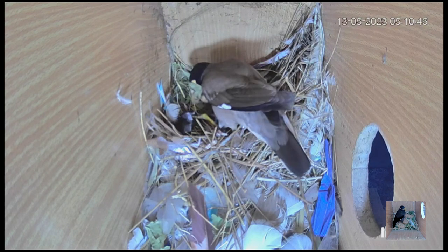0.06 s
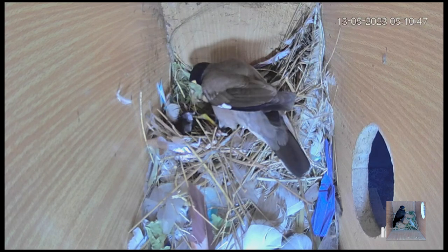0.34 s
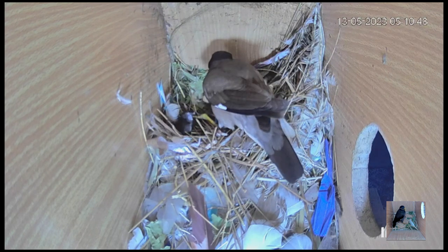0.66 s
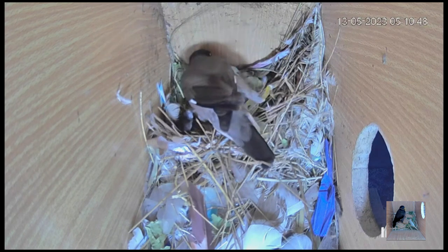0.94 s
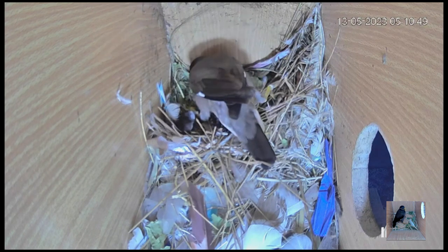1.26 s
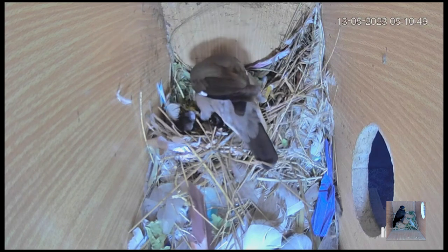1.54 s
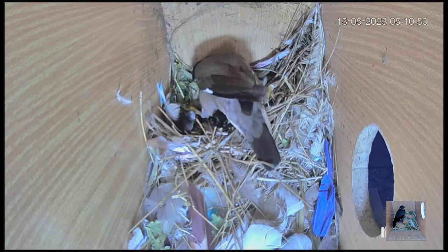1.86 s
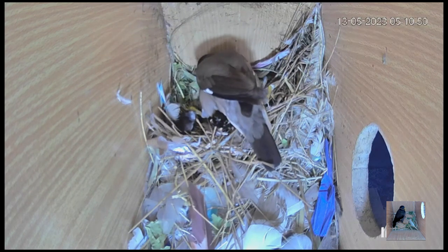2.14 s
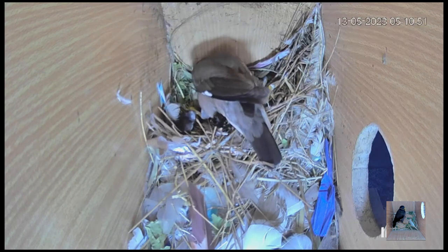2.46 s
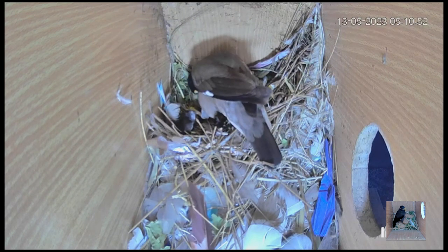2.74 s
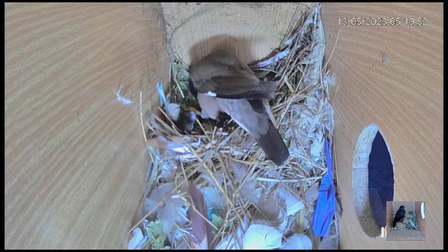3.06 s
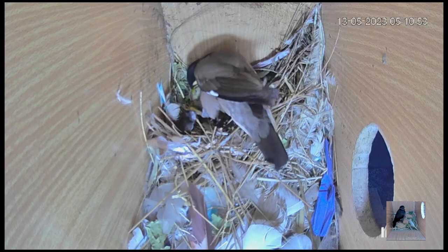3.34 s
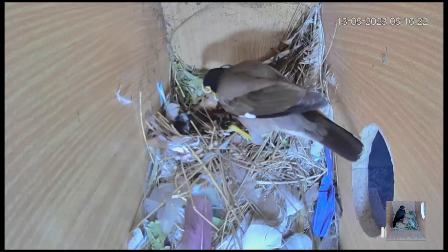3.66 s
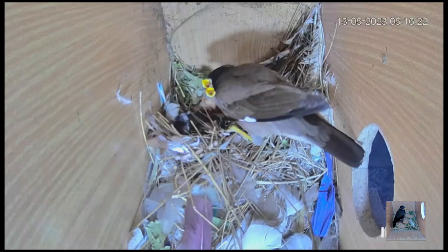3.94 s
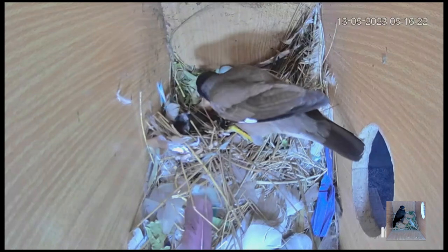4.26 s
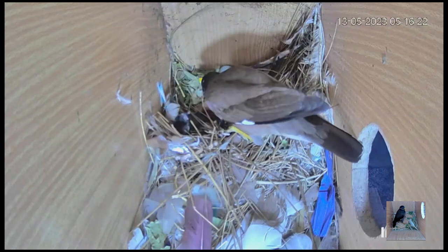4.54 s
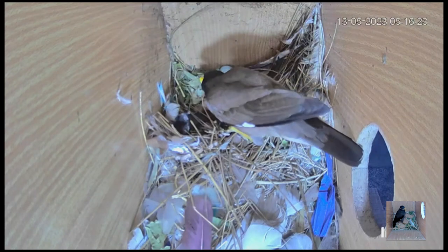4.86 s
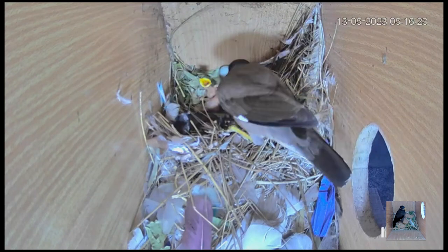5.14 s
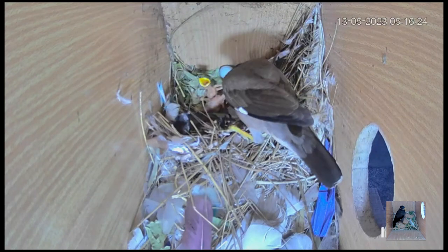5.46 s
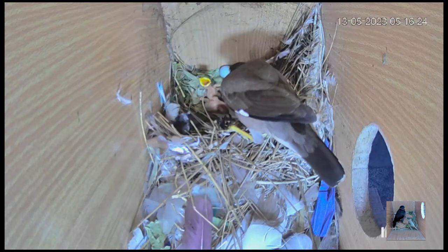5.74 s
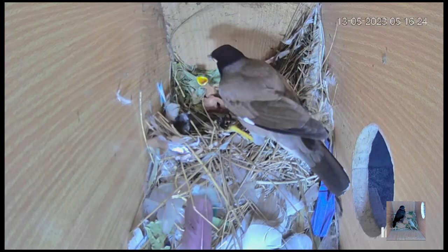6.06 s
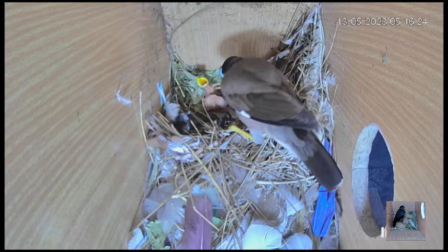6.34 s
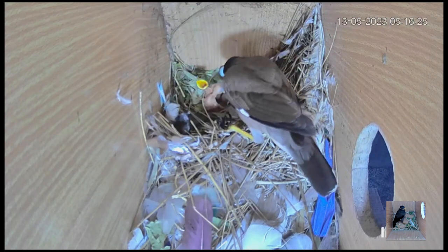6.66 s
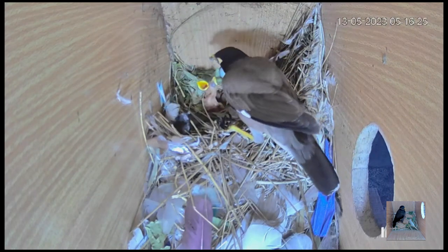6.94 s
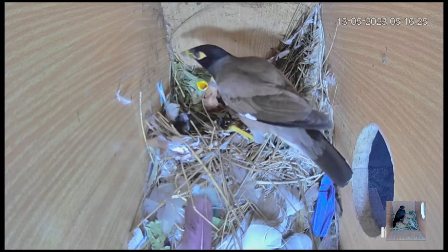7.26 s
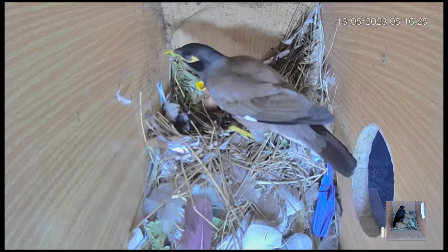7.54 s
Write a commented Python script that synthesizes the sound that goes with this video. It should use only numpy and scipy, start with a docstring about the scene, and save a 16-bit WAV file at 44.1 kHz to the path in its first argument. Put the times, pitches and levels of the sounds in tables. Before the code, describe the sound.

Newly hatched chicks give short, high cheeps inside a wooden nest box, close to the microphone. An adult bird shifts about, crackling dry straw, thudding softly and knocking on the wood, loudest about a second in. Halfway through, the sound cuts out for an instant; then the chicks beg with quieter, raspy, falling calls. Faint birds peep and call outside over a low rumble and thin hiss.

```python
"""Soft arched cheeps, then rasping, falling begging calls: newly hatched chicks in a wooden nest box,
close to a nest camera's microphone. They cheep from under the parent and beg as it steps aside.
The parent snaps straw, thuds on the floor, knocks and scrapes the wood; the close walls echo.
Other birds peep, hoot and call outside, over low rumble and thin hiss.
The sound drops out for a moment half way through."""
import sys
import numpy as np
from scipy import signal
from scipy.fft import rfft, irfft, next_fast_len
from scipy.io import wavfile

SR = 44100
rng = np.random.default_rng(int(sys.argv[2]) if len(sys.argv) > 2 else 0)


def master_out(mix):
    """Clip the mix to full scale and print it as 16-bit PCM to the path in sys.argv[1]."""
    frames = np.transpose(np.atleast_2d(mix))
    ceiling = np.clip(frames, -1, 1)
    pcm = np.round(ceiling * 32767).astype(np.int16)
    wavfile.write(sys.argv[1], SR, pcm)


N = 334719
TIME = np.arange(N) / SR

# parent's moves on the straw: (centre time [s], half length [s], level [dB])
MOVES = [(0.094, .016, -67.5), (0.792, .0028, -60), (0.977, .014, -32.5), (1.026, .0046, -33),
         (1.039, .018, -38), (1.099, .008, -47.5), (0.1, .06, -71.5), (1.75, .12, -77), (1.157, .003, -56),
         (1.573, .013, -56), (1.693, .02, -60.5), (1.88, .015, -65), (2.925, .036, -65.5),
         (2.957, .0046, -54), (2.992, .02, -66.5), (3.214, .007, -68), (3.274, .02, -66),
         (3.447, .024, -66.5), (3.814, .052, -72.5), (3.9, .013, -67.5), (4.209, .008, -77),
         (4.748, 0.0027, -70.5), (5.436, .012, -78.5), (5.571, 0.021, -77), (5.874, .011, -59),
         (6.388, .02, -70), (7.48, 0.0047, -74)]
RASP_PITCH_RATIO = 0.81  # rasp pitch / crest pitch of a begging call


def undb(db):
    """Decibels to gain."""
    return 10 ** (np.asarray(db) / 20)


def unit(x):
    """Scale to rms 1."""
    return x / np.sqrt(np.mean(np.abs(x) ** 2))


def gain_at(hz, spectrum):
    """Gain at hz of a (frequency [Hz], level [dB]) spectrum."""
    points_hz, db = np.transpose(spectrum)
    return undb(np.interp(np.log(np.maximum(hz, 1)), np.log(points_hz), db))


def colour(x, spectrum):
    """Filter by a (frequency [Hz], level [dB]) spectrum; rms 1."""
    return unit(irfft(rfft(x) * gain_at(np.fft.rfftfreq(N, 1 / SR), spectrum), N))


def flutter(width_hz, size):
    """Complex random wavering, slower than width_hz; rms 1."""
    band = 1 / (1 + (np.fft.fftfreq(next_fast_len(size), 1 / SR) / width_hz) ** 8)
    white = rng.standard_normal((len(band), 2)) @ np.array([1, 1j])
    return unit(np.fft.ifft(white * band)[:size])


def swell(at_s, half_s):
    """Rounded peak in time with exponential skirts."""
    return 1 / np.cosh(np.minimum(2 * np.abs(TIME - at_s) / half_s, 20))


def crackle(snaps_per_s, spread_db):
    """Dense tiny snaps of unequal size."""
    snaps = rng.random(N) < snaps_per_s / SR
    return snaps * rng.standard_normal(N) * undb(spread_db * np.minimum(rng.exponential(size=N), 4))


def background(rumble_db=-63.5, hiss_db=-86.5, settle_s=1.9, settle_db=5):
    """Outdoor rumble through the walls and a hiss that flickers band by band; both louder at first."""
    # rumble and hiss spectra: (frequency [Hz], relative level [dB])
    rumble_spectrum = [(12, -44.5), (20, -9), (49, -0.5), (125, -1.5), (213, -23.5), (280, -20.5),
                       (429, -33), (492, -26.5), (756, -40.5), (837, -45.5), (944, -35.5), (1200, -49.5),
                       (1560, -72.5), (2640, -120)]
    hiss_spectrum = [(700, -30), (1200, -8.5), (1900, -7), (2400, -10), (3200, -9), (4200, 1.5),
                     (4900, -11), (5400, -11.5), (6000, -20), (7200, -17.5), (8000, -39.5)]
    early_db = settle_db * (1 - np.tanh(2 * (TIME - settle_s))) / 2
    rumble = colour(rng.standard_normal(N), rumble_spectrum)
    rumble *= undb(rumble_db + early_db + 2.5 * flutter(16, N).real)
    hiss_bins = rfft(colour(rng.standard_normal(N), hiss_spectrum))
    hz = np.fft.rfftfreq(N, 1 / SR)
    edges_hz = np.linspace(0, 8000, 15)
    hiss = np.zeros(N)
    for low_hz, high_hz in zip(edges_hz, edges_hz[1:]):
        band = irfft(hiss_bins * ((hz >= low_hz) & (hz < high_hz)), N)
        hiss += band * undb(flutter(23, N).real)
    drift_db = 1.5 * flutter(12, N).real
    return rumble + unit(hiss) * undb(hiss_db + early_db + drift_db)


def far_hoot(at_s=3.115, half_s=0.026, hz=485.6, level_db=-65):
    """One short, soft, low note from outside."""
    return undb(level_db) * swell(at_s, half_s) * np.sin(2 * np.pi * hz * TIME)


def far_peeps(half_s=0.035, droop=0.023):
    """Faint, slightly falling peeps, blurred by distance."""
    # birds outside: (centre time [s], pitch [Hz], level [dB])
    peeps = [(0.029, 5250, -67.5), (0.286, 4830, -69.5), (0.324, 3900, -68.5), (0.621, 5260, -71),
             (0.895, 3470, -76), (1.361, 5400, -76), (1.97, 5350, -71.5), (2.265, 4570, -69.5),
             (2.595, 4040, -71), (2.62, 3450, -71.5), (3.339, 4180, -69), (4.425, 4120, -75),
             (5.03, 3930, -75.5), (5.661, 4280, -77.5)]
    out = np.zeros(N)
    scatter = 1 + flutter(230, N)
    for at_s, hz, db in peeps:
        near = np.abs(TIME - at_s) < half_s
        position = (TIME[near] - at_s) / half_s
        phase = 2 * np.pi * np.cumsum(hz * (1 - droop * position)) / SR
        envelope = np.cos(np.pi / 2 * position) ** 2
        out[near] += undb(db) * envelope * np.imag(scatter[near] * np.exp(1j * phase))
    return out


def far_call(start_s=5.94, attack_s=0.22, hold_s=0.2, release_s=0.26, level_db=-58,
             crest_s=6.33, crest_hz=594, sag_hz_per_s2=450, jitter=0.0066):
    """Nasal call on one slow pitch arch; outdoor echoes make each harmonic waver on its own."""
    # throat resonances: (frequency [Hz], gain [dB])
    throat = [(590, -31.5), (1170, -9.5), (1780, -14.5), (2380, -11), (2960, -18.5), (3540, -1.5),
              (4140, 1), (4730, -10.5), (5320, -7.5), (5900, -23), (7000, -35)]
    corners_s = np.cumsum([start_s, attack_s, hold_s, release_s])
    on = (TIME > corners_s[0]) & (TIME < corners_s[-1])
    t = TIME[on]
    hz = crest_hz - sag_hz_per_s2 * (t - crest_s) ** 2
    phase = 2 * np.pi * np.cumsum(hz * (1 + jitter * flutter(33, len(t)).real)) / SR
    harmonics = 0
    for k in range(1, 13):
        waver = 1 + 1.2 * flutter(26 * np.sqrt(k), len(t))
        harmonics += gain_at(k * hz, throat) * np.imag(np.exp(1j * k * phase) * waver)
    envelope = np.interp(t, corners_s, [0, 1, 1, 0]) ** 1.4
    out = np.zeros(N)
    out[on] = undb(level_db) * envelope * unit(harmonics)
    return out


def box_echoes(x):
    """Add echoes from the close walls; they beat against each gliding note."""
    # wall reflections: (delay [ms], gain [dB])
    echoes = [(1.7, -18), (4.3, -13), (7.6, -12)]
    return x + sum(undb(db) * np.interp(TIME - ms / 1000, TIME, x, left=0) for ms, db in echoes)


def straw(pressure):
    """Each move of the parent snaps many dry stalks."""
    # crackling straw: (frequency [Hz], relative level [dB])
    spectrum = [(200, -28), (600, -24.5), (1100, -8), (1800, -10.5), (2250, -2.5), (2600, -10),
                (3100, -0.5), (3700, -3.5), (4300, 8), (5000, -9), (5700, -4), (6500, -18), (7300, -29.5)]
    return pressure * colour(crackle(snaps_per_s=1200, spread_db=-1), spectrum)


def boards(pressure, through_straw_db=-10, knock_db=3, scrape_db=-23):
    """The wood rings: each move knocks it once, claws scrape it, a few knocks land on bare board."""
    # knocks on bare wood: (time [s], level [dB])
    bare_knocks = [(0.972, -39), (1.026, -25), (2.99, -53), (4.656, -65), (5.43, -68)]
    # box modes: (frequency [Hz], T60 [s], level [dB])
    modes = [(185, 0.31, -6), (272, 0.13, -13), (488.5, 0.22, -15), (551, .08, -14), (673, .04, -10),
             (778, 0.052, 6), (910, 0.038, -14.5), (1504.4, 0.12, -5.5), (2180, 0.056, -6)]
    scrape = unit(crackle(snaps_per_s=4300, spread_db=0.77))
    force = undb(through_straw_db + scrape_db) * pressure * scrape
    for at_s, half_s, db in MOVES:
        force[int((at_s - half_s / 2) * SR)] += undb(db + through_straw_db + knock_db)
    for at_s, db in bare_knocks:
        force[int(at_s * SR)] += undb(db)
    t = TIME[:SR // 4]
    ring = sum(undb(db - 60 * t / t60_s) * np.sin(2 * np.pi * hz * t) for hz, t60_s, db in modes)
    return signal.fftconvolve(force, ring / np.abs(ring).max())[:N]


def thuds():
    """The parent's weight presses on the padded floor."""
    # loads on the floor: (centre time [s], half length [s], level [dB])
    loads = [(0.094, 0.0071, -45), (0.34, 0.048, -42), (0.552, 0.02, -49.5), (0.803, 0.022, -47),
             (1.035, 0.02, -42), (1.099, 0.016, -45.5), (1.528, 0.011, -48.5), (2.525, 0.041, -52),
             (2.956, 0.015, -44.5), (7.015, 0.037, -51), (7.247, 0.036, -48)]
    # thud spectrum: (frequency [Hz], relative level [dB])
    spectrum = [(25, -13.5), (60, -3.5), (90, -0.5), (125, -4), (190, -20.5), (300, -31.5), (600, -61.5)]
    weight = sum(undb(db) * swell(at_s, half_s) for at_s, half_s, db in loads)
    # bedding gives way with even strength, at no set pitch
    give = np.sign(colour(rng.standard_normal(N), spectrum))
    return weight * colour(give, spectrum)


def parent(fidget_db=-91, fidget_spread_db=7, fidget_hz=3.7):
    """The adult shifts about the nest and fidgets faintly between moves."""
    moves = sum(undb(db) * swell(at_s, half_s) for at_s, half_s, db in MOVES)
    pressure = moves + undb(fidget_db + fidget_spread_db * flutter(fidget_hz, N).real)
    return straw(pressure) + boards(pressure) + thuds()


def spit(t, centre_hz=4500, width_hz=2300):
    """Broad noise of air forced through a small throat."""
    return np.imag(flutter(width_hz, len(t)) * np.exp(2j * np.pi * centre_hz * t))


def whistle(hz, tone_gain, blur_gain, octave_db, blur_width_hz=380, blur_under_hz=50):
    """A chick's whistle and two overtones; a narrow noise band centred just under each blurs it."""
    phase = 2 * np.pi * np.cumsum(hz) / SR
    downshift = np.exp(-2j * np.pi * blur_under_hz * np.arange(len(hz)) / SR)
    out = 0
    for k, partial_db, extra_blur_db in [(1, 0, 0), (2, octave_db, 6), (3, octave_db - 23, 6)]:
        clear = tone_gain * (1 + 0.65 * flutter(74, len(hz)))
        band = flutter(blur_width_hz * np.sqrt(k), len(hz)) * downshift ** k
        blur = blur_gain * undb(extra_blur_db) * band
        out += undb(partial_db) * np.imag(np.exp(1j * k * phase) * (clear + blur))
    return out


def rasp(t, decay_s, hz, attack_s=0.0018, flap_hz=135, flap_depth=0.37, width_hz=230, spit_db=-9):
    """The syrinx flaps before it settles: smeared harmonics and a spit of noise, in quick pulses."""
    out = undb(spit_db) * spit(t)
    for k, partial_db in enumerate([0, 5, -12], 1):
        out += undb(partial_db) * np.imag(flutter(width_hz, len(t)) * np.exp(2j * np.pi * k * hz * t))
    since_s = t - attack_s
    flaps = 1 + flap_depth * np.cos(2 * np.pi * flap_hz * since_s)
    envelope = np.where(since_s < 0, np.exp(since_s / attack_s), np.exp(-(since_s / decay_s) ** 2))
    return out * flaps * envelope


def beg(t, length_s, crest_hz, end_hz, octave_db, rasp_s, attack_s=0.012, release_s=0.017):
    """The whistle climbs out of the rasp, then slides down; a longer rasp: slower climb, more blur."""
    rise_s = 1.1 * rasp_s
    rise = np.sin(np.pi / 2 * np.clip(t / rise_s, 0, 1))
    fall = np.sin(np.pi / 2 * np.clip((t - rise_s) / (length_s - rise_s), 0, 1)) ** 2
    hz = crest_hz * (RASP_PITCH_RATIO + (1 - RASP_PITCH_RATIO) * rise) - (crest_hz - end_hz) * fall
    ramp = np.minimum(t / (attack_s + rise_s), (length_s - t) / release_s)
    tone_gain = np.sin(np.pi / 2 * np.clip(ramp, 0, 1)) ** 1.3
    blur_peak = undb(-23) * rasp_s / (0.089 * length_s)
    blur_gain = blur_peak * np.exp(-((t / length_s - 0.5) / 0.36) ** 2)
    return whistle(hz, tone_gain, blur_gain, octave_db)


def cheep(t, length_s, crest_hz, octave_db, blur_db, attack_share=0.36, arch_hz_per_s=8400,
          noise_lead_s=0.027, noise_rise_s=0.004, blur_lag_s=0.0014, scratch_db=-10):
    """Pitch and level arch round t = 0; scratchy attack; narrow noise blurs it and lingers briefly."""
    from_crest = np.abs(t) / (length_s * np.where(t < 0, attack_share, 1 - attack_share))
    depth_hz = arch_hz_per_s * length_s * np.where(t < 0, 0.5, 1)  # ends lower than it starts
    hz = crest_hz - depth_hz * np.tanh(from_crest ** 2)
    tone_gain = np.sin(np.pi / 2 * np.maximum(1 - from_crest, 0)) ** 2.6
    noise_onset = (1 + np.tanh((t + noise_lead_s) / noise_rise_s)) / 2
    blur_s = 0.0083 + 0.26 * length_s
    blur_gain = undb(blur_db) * noise_onset * np.exp(-((t - blur_lag_s) / blur_s) ** 2)
    scratch_gain = undb(scratch_db + octave_db) * noise_onset * np.exp(-(t / (0.2 * length_s) + 1) ** 2)
    return scratch_gain * spit(t) + whistle(hz, tone_gain, blur_gain, octave_db)


def chicks():
    """Soft cheeps, then begging from gaping beaks: a rasp and a falling whistle each."""
    # cheeps: (crest time [s], length [s], crest pitch [Hz], level [dB], octave [dB], blur [dB])
    cheeps = [(0.249, 0.04, 2716, -34.5, -32, -22), (0.398, 0.097, 3409, -32, -16.5, -11.5),
              (0.42, 0.042, 4049, -24, -39.5, -17), (0.811, .054, 4157, -24, -34, -11.5),
              (0.849, 0.04, 2640, -45.5, -21.5, -13), (1.017, 0.079, 3472, -28.5, -26.5, -15),
              (1.174, 0.035, 3980, -24.5, -33.5, -15.5), (1.482, 0.019, 2832, -32.5, -27.5, -17.5),
              (1.603, 0.048, 4002, -29.5, -39, -12), (2.297, 0.047, 2437, -56.5, -12.5, -15.5),
              (2.719, 0.012, 3233, -48.5, -34, -1.5), (2.731, 0.05, 4317, -23.5, -44.5, -9),
              (2.906, 0.078, 3174, -31.5, -14, -15), (3.148, 0.046, 2863, -34, -15.5, -11.5),
              (3.393, 0.067, 3150, -33, -17.5, -14.5), (3.619, .066, 3043, -34, -19.5, -17)]
    # begging calls: (time [s], length [s], crest pitch [Hz], end pitch [Hz], level [dB], octave [dB],
    # rasp decay [s], rasp level [dB])
    begs = [(2.436, 0.056, 2543, 2396, -55, 5, 0.0048, -75),
            (4.003, 0.07, 2711, 2577, -43.5, -7, 0.0041, -62),
            (4.495, 0.054, 3380, 3380, -45.5, -12, 0.011, -55.5),
            (4.533, .044, 3147, 2630, -45, 1.5, 0.0091, -53),
            (4.951, 0.043, 3415, 3150, -47.5, -13.5, 0.01, -54),
            (5.248, 0.056, 2940, 2260, -51, -0.5, 0.014, -46),
            (5.482, .034, 2568, 2362, -41.5, -8, .003, -74),
            (6.029, 0.068, 2970, 2210, -49.5, 7.5, .014, -48),
            (6.187, 0.072, 2990, 2420, -38, -3, .013, -41),
            (6.936, 0.059, 2877, 2190, -48.5, 3.5, .02, -45.5),
            (7.187, 0.094, 3107, 2200, -37.5, -3, 0.012, -42),
            (7.328, .04, 2300, 2290, -54.5, -2, 0.0039, -78)]
    out = np.zeros(N)
    for at_s, length_s, crest_hz, db, octave_db, blur_db in cheeps:
        near = np.abs(TIME - at_s) < 0.1
        out[near] += undb(db) * cheep(TIME[near] - at_s, length_s, crest_hz, octave_db, blur_db)
    for at_s, length_s, crest_hz, end_hz, db, octave_db, rasp_s, rasp_db in begs:
        near = np.abs(TIME - at_s) < 0.15
        t = TIME[near] - at_s
        out[near] += undb(db) * beg(t, length_s, crest_hz, end_hz, octave_db, rasp_s)
        out[near] += undb(rasp_db) * rasp(t, rasp_s, RASP_PITCH_RATIO * crest_hz)
    return out


def scene():
    """Chicks and parent inside the box, the outdoors beyond it; mono."""
    inside = box_echoes(chicks() + parent())
    return (inside + far_peeps() + far_call() + far_hoot() + background())[None]


def record(dry, mute_from_s=3.613, mute_to_s=3.71, cutoff_hz=7100):
    """The sound cuts out briefly; the camera passes no top treble."""
    live = (TIME < mute_from_s) | (TIME > mute_to_s)
    lowpass = signal.ellip(10, 0.2, 70, cutoff_hz, fs=SR, output="sos")
    return signal.sosfilt(lowpass, dry * live)


dry = scene()
out = record(dry)
master_out(out)
```